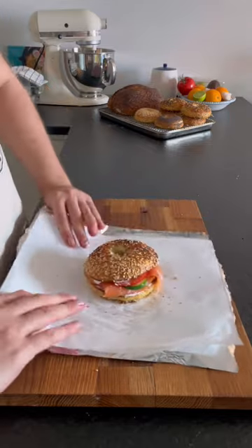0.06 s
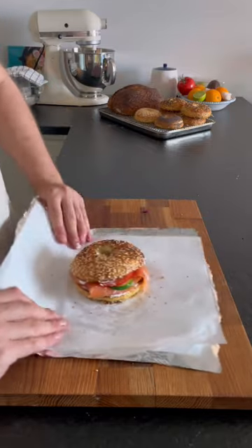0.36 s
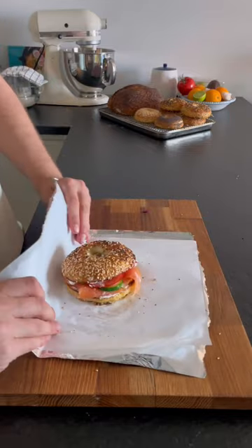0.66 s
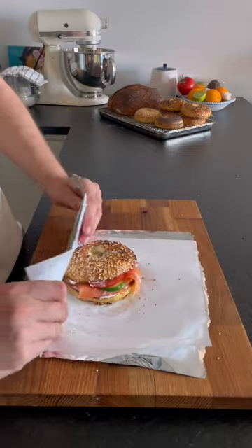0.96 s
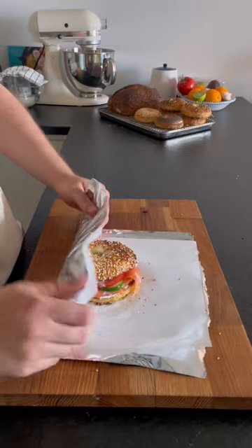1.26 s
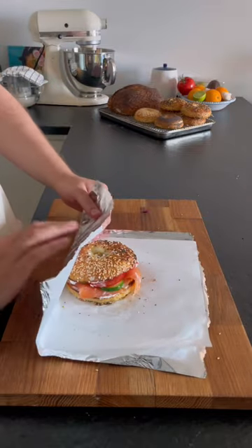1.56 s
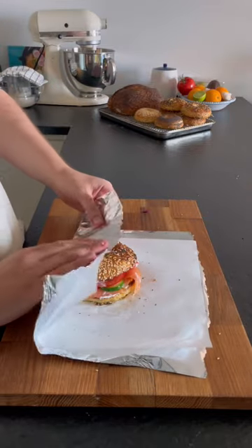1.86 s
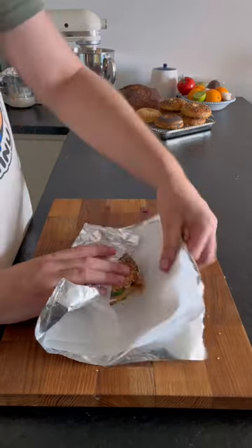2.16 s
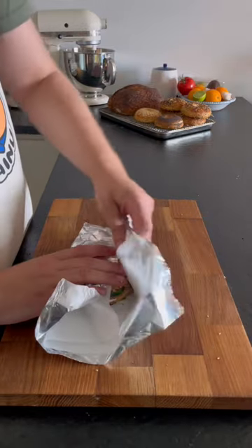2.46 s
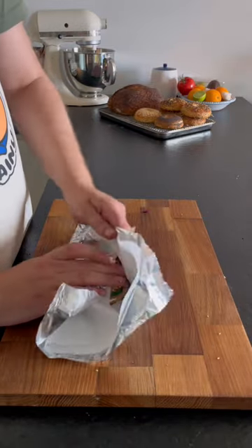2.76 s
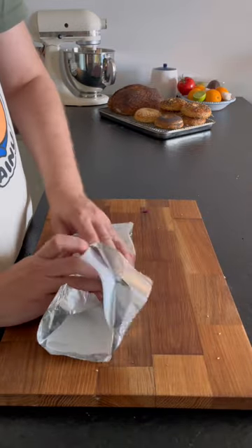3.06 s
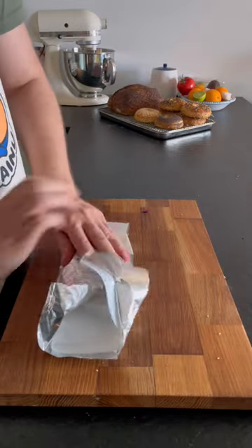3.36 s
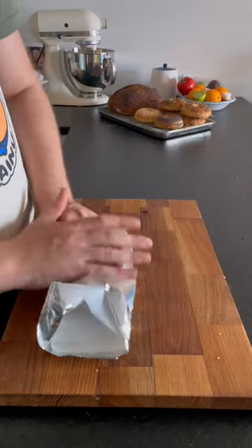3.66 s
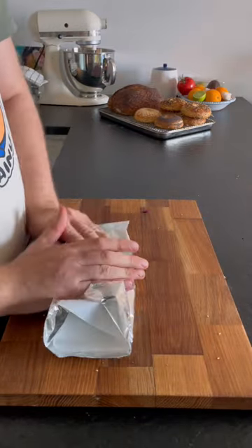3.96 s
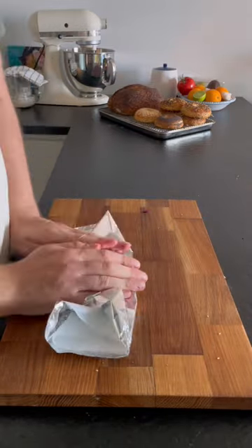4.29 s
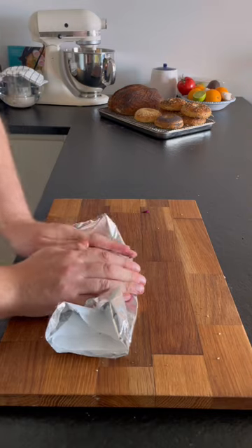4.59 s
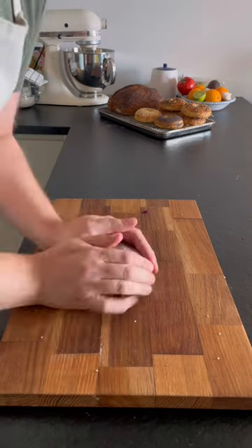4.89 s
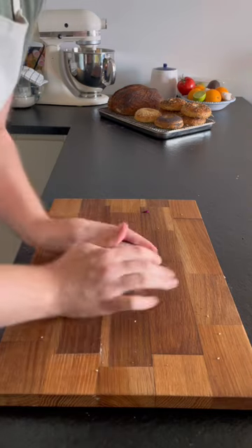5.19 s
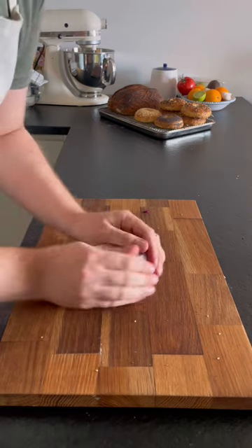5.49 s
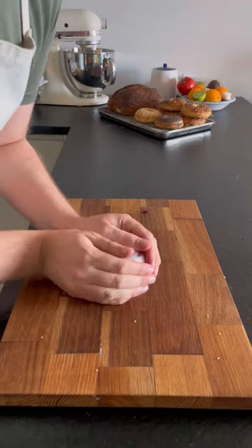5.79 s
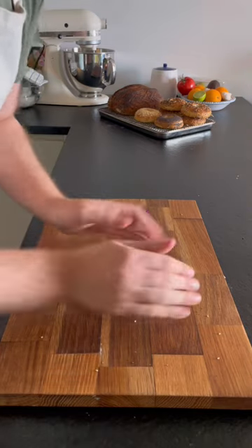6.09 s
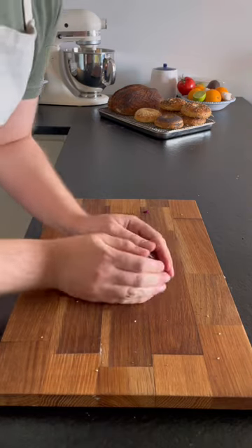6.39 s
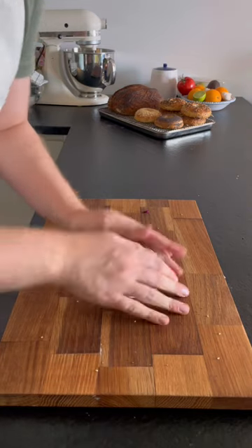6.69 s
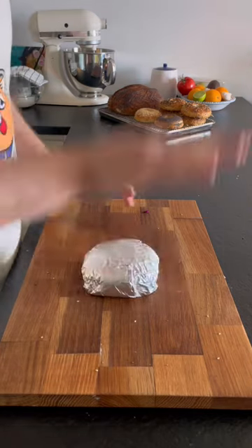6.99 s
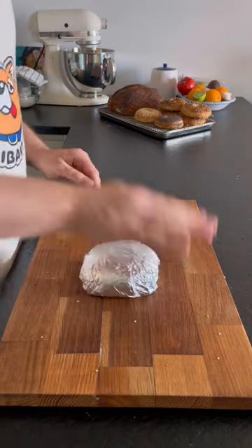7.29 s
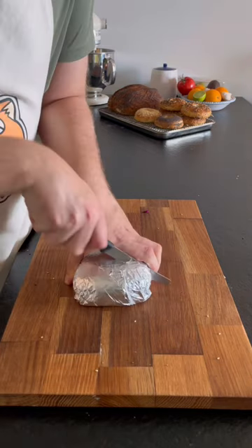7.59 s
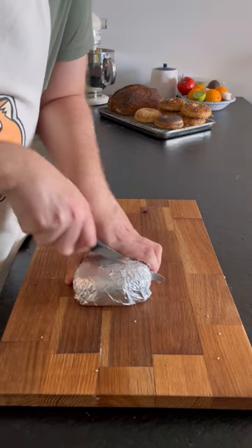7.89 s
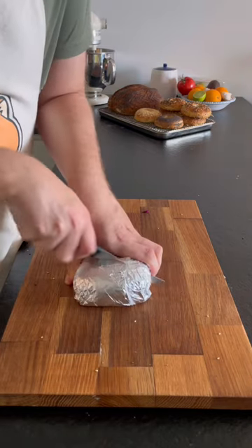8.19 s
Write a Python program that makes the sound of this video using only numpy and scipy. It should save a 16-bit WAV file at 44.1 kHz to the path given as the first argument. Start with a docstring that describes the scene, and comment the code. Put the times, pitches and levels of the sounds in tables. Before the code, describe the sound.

Paper and aluminium foil crinkle as they are wrapped around a bagel, then one firm pat and a knife sawing into the foil.

```python
"""A bagel is wrapped on a wooden board in a kitchen, close to a small two-port microphone.
Parchment slides first; from 1.5 s aluminium foil folds and crumples, its creases buckling and its facets
popping. From 4.9 s palms squeeze and smooth the parcel, and at 7 s one firm pat thumps the board.
From 7.5 s a serrated knife saws into the foil in four strokes. A low room rumble lies under it all."""
import sys
import numpy as np
from scipy import signal
from scipy.fft import rfft, irfft, next_fast_len
from scipy.io import wavfile
from scipy.ndimage import uniform_filter1d

SR = 44100
rng = np.random.default_rng(int(sys.argv[2]) if len(sys.argv) > 2 else 0)


def wav_record(signal):
    """Record a signal, one row per channel, as 16-bit PCM in the file named by sys.argv[1]."""
    frames = np.transpose(np.atleast_2d(signal))
    bounded = np.clip(frames, -1, 1)
    # unit amplitude maps onto the largest positive 16-bit level
    quanta = np.round(bounded * 32767).astype(np.int16)
    wavfile.write(sys.argv[1], SR, quanta)


N = 372644
TIME = np.arange(N) / SR
FFT_SIZE = next_fast_len(N + SR)
BIN_HZ = np.arange(FFT_SIZE // 2 + 1) * SR / FFT_SIZE
CUTOFF_HZ = 16100


# Spectra of the two sheets. Each row: frequency in Hz, relative level in dB.
PAPER_SPECTRUM = [(130, -15), (400, -5), (1300, -10.5), (2600, -13), (4000, -5.5), (6000, -1), (8500, 2),
                  (10800, 4), (13000, -7.5), (16000, -28)]
FOIL_SPECTRUM = [(130, -12.5), (400, -7.5), (1100, -1), (2400, -11), (3700, -1.5), (4900, -6.5),
                 (6200, 2.5), (8200, -1.5), (10000, 0.5), (12000, -1.5), (14000, -28), (16000, -40)]
# Hollowness of lifted or cupped panels. Each row: time in seconds, body re crackle in dB.
HOLLOWNESS = [(0, -21.5), (.45, -12.5), (1.05, -2.5), (1.55, -23), (2.0, -12.5), (2.2, -21.5), (2.7, -10.5),
              (3.45, -12), (4.0, -3.5), (4.6, -5.5), (5.0, -10)]

def wrapping(foil_from_s=1.5, press_from_s=3.44, press_takes_s=0.62):
    """Parchment slides first, then the foil buckles; the bass goes as the air is pressed out."""
    strength, sliding = folding(), TIME < foil_from_s
    pressed = np.clip((TIME - press_from_s) / press_takes_s, 0, 1)
    pocket_db = np.where(sliding, -10.5, 6 * (1 - pressed) - 9 * pressed)
    # foil buckles more often the harder it is worked
    foil_per_s = 3600 * (strength / from_db(-38)) ** .75
    paper_hits = creases(per_s=7000, spread_db=2, clump_db=2.5) * sliding
    paper = sheet(paper_hits, PAPER_SPECTRUM, damping=5.4, travel_s=.0008)
    foil_hits = creases(foil_per_s, spread_db=2.5, clump_db=1.36) * ~sliding
    foil = sheet(foil_hits, FOIL_SPECTRUM, damping=5.4, travel_s=.0006)
    flips = crinkles(per_s=150, level_db=2.5, spread_db=3.5) * from_db(-3 * sliding)
    crackle = from_db(0.1) * rustle(paper + foil, in_time(HOLLOWNESS), pocket_db)
    return strength * (crackle + flips)


# Steady handling of the sheets. Each row: time in seconds, level in dB.
CARRY_LEVELS = [(0, -41.5), (.5, -43), (.95, -54.5), (1.3, -46), (1.44, -55.5), (1.5, -65.5), (1.66, -50),
                (1.9, -45), (2.13, -46.5), (2.25, -37.5), (2.6, -40.5), (2.8, -43.5), (3.1, -40.5),
                (3.33, -47.5), (3.45, -43), (3.56, -53.5), (3.75, -39.5), (4.0, -43), (4.35, -43.5),
                (4.5, -47.5), (4.8, -49), (4.9, -51)]
# Folds pushed in by hand. Each row: start in seconds, length in seconds, level in dB.
HAND_FOLDS = [(.065, 0.017, -34.5), (.18, 0.083, -39), (.36, 0.039, -40), (.692, 0.017, -43),
              (1.05, 0.021, -45), (1.26, 0.018, -43), (1.688, 0.034, -45), (1.785, 0.081, -45),
              (2.0, 0.046, -41), (2.154, 0.043, -33), (2.356, 0.0087, -30), (2.433, 0.018, -34.5),
              (2.513, 0.051, -37), (2.655, 0.08, -39.5), (2.833, 0.041, -37.5), (3.033, 0.12, -41.5),
              (3.17, 0.079, -38.5), (3.358, 0.049, -35.5), (3.645, 0.077, -38), (3.84, 0.14, -46.5),
              (4.106, 0.02, -37), (4.211, 0.024, -36.5), (4.36, 0.083, -41.5), (4.568, 0.075, -44.5),
              (4.752, 0.052, -46)]

def folding():
    """Gain of the crackle: the carried sheets rustle on, and every fold adds a burst."""
    carrying = during(CARRY_LEVELS[0][0], CARRY_LEVELS[-1][0]) * from_db(in_time(CARRY_LEVELS))
    return np.hypot(carrying, gestures(HAND_FOLDS, attack_s=.0046, release_s=.016))


def creases(per_s, spread_db, clump_db):
    """Random tiny bucklings, many small and a few large, that come in clumps."""
    sizes = from_db(spread_db * np.minimum(rng.exponential(1, N), 4.6) + clump_db * drift(130))
    return sizes * (rng.random(N) < per_s / SR)


def sheet(hits, spectrum, damping, travel_s, modes=36, facets=1009, wander_db=3.5, wander_per_s=45):
    """Every hit bends one facet, which rings the broad modes with strengths and delays of its own."""
    at, out = np.flatnonzero(hits), np.zeros(N)
    facet, force = at % facets, hits[at]
    for hz in np.linspace(np.sqrt(140), np.sqrt(CUTOFF_HZ), modes) ** 2:
        r, w = np.exp(-np.pi * damping * np.sqrt(hz) / SR), 2 * np.pi * hz / SR
        # long bending waves cross the sheet more slowly
        lag = (travel_s * SR * (4000 / hz) ** .3 * rng.random(facets)).astype(int)
        strength = from_db(at_hz(spectrum, hz)) * (1 - r) * rng.standard_normal(facets)
        # each mode grows and fades as the sheet bends
        wander = np.interp(at / SR * wander_per_s, np.arange(facets), rng.standard_normal(facets))
        push = np.full(N, 1e-18)
        push[np.minimum(at + lag[facet], N - 1)] = force * strength[facet] * from_db(wander_db * wander)
        out += signal.lfilter([1], [1, -2 * r * np.cos(w), r * r], push)
    return signal.lfilter([1, 0, -1], [1], out)


def rustle(grains, body_db, pocket_db):
    """Small facets give the crisp top, whole panels the hollow body, trapped air the bass."""
    top = evened(band(grains, 2000, "high"), [2500, 8000])
    body = evened(band(grains, 2000, "low"), [500, 2000])
    bass = zero_phase_band(body, 550, "low")
    body = band(body + (from_db(pocket_db) - 1) * bass, 117, "high")
    return top - from_db(body_db) * body


# Large creases. Each row: time in seconds, relative level in dB, body re crack in dB.
CREASE_SNAPS = [(0.5677, -23, -0.5), (1.2378, -27, -3), (1.6054, -28, -1), (1.785, -27.5, 3.5),
                (1.933, -22, -2), (2.3701, -18.5, 1.5), (3.04, -19.5, 2.5), (3.082, -20.5, 2.5),
                (3.3625, -28, 6.5), (3.6624, -17, -8), (3.799, -16.5, 3), (3.901, -24, 6.5),
                (4.215, -27, 0), (4.37, -20.5, -11), (4.9071, -29.5, -8), (5.5075, -27, -19),
                (5.621, -28.5, -21), (6.3268, -38, 0), (6.8666, -37, -21), (7.2075, -33.5, -2)]

def snaps(strays_per_s=15):
    """A large crease flips with a sharp crack and drags neighbours along; lesser ones come by chance."""
    times, level_db, body_db = np.transpose(CREASE_SNAPS)
    strays = from_db(12.5) * folding() * (rng.random(N) < strays_per_s / SR)
    hits = avalanche(clicks(times, level_db) + strays, fade_s=.0042, follow_db=-10)
    cracks = from_db(12.5) * band(sheet(hits, FOIL_SPECTRUM, damping=5.6, travel_s=.0004), 280, "high")
    latest = np.maximum(np.searchsorted(times - .002, TIME) - 1, 0)
    return band(cracks, 2600, "high") - from_db(body_db[latest]) * band(cracks, 2600, "low")


def avalanche(hits, fade_s, follow_db):
    """Each hit sets off a dying run of smaller ones."""
    energy = signal.lfilter([1], [1, -np.exp(-2 / (fade_s * SR))], hits ** 2 + 1e-18)
    followers = (rng.random(N) < .1) * (energy > 1e-8)
    return hits + from_db(follow_db) * np.sqrt(energy) * followers


# Taut facets flipping over. Each row: time in seconds, level in dB, pitch in Hz.
FACET_POPS = [(.523, -25.5, 3450), (.705, -25, 1170), (1.237, -26, 1260), (1.326, -32, 1320),
              (1.728, -24, 5900), (1.756, -28, 3200), (2.002, -37, 4130), (2.365, -21, 3770),
              (2.4525, -19, 6600), (2.7025, -23, 2550), (3.38, -30, 624), (3.639, -27, 3700),
              (4.0197, -26, 1440), (4.068, -19, 3520), (4.112, -27, 810), (4.225, -33, 950),
              (4.403, -25.5, 660), (4.59, -29.5, 1050), (4.62, -23, 1580), (4.706, -29.5, 3150),
              (5.43, -39, 1280), (5.528, -31, 2950), (5.681, -29, 3860), (6.181, -29, 6340),
              (6.504, -34, 1880), (8.337, -27.5, 695)]

def pops(rows):
    """Facets flip with a pitched tick; small ones ring higher and die sooner."""
    out, t = np.zeros(N + SR), TIME[:SR // 50]
    for start_s, level_db, hz in rows:
        at, t60_s = round(start_s * SR), .0093 * (1000 / hz) ** .23
        out[at:at + len(t)] += from_db(level_db - 60 * t / t60_s) * np.sin(2 * np.pi * hz * t)
    return band(out[:N], 420, "high")


# Facet pitch ranges, all equally likely. Each entry: range edge in Hz.
CRINKLE_EDGES_HZ = [1080, 2900, 4220, 5660, 6800, 8500]

def crinkles(per_s, level_db, spread_db, count=2000):
    """Facets flip by chance: separate little ticks at ever-changing pitches."""
    wait, size, pitch = rng.random((count, 3)).T
    times = np.cumsum(-np.log(1 - wait)) / per_s
    levels_db = level_db + spread_db * np.minimum(-np.log(1 - size), 2)
    hz = np.interp(pitch, np.linspace(0, 1, len(CRINKLE_EDGES_HZ)), CRINKLE_EDGES_HZ)
    return pops(np.transpose([times, levels_db, hz])[times < TIME[-1]])


# Palm strokes. Each row: start, rise, length and fade in seconds, level in dB, body re crackle in dB.
PALM_RUBS = [(5.062, 0.165, 0.16, 0.033, -39, -14.5), (5.785, 0.081, 0.19, 0.051, -43, -10.5)]
# Squeezes. Each row: start and length in seconds, level in dB, body re crackle in dB.
HAND_SQUEEZES = [(4.886, 0.088, -49.5, -24), (4.998, 0.16, -55.5, -23), (5.389, 0.15, -50, -20),
                 (5.517, 0.044, -45.5, -23), (5.602, 0.086, -51, -24), (5.731, 0.16, -57.5, -17),
                 (6.15, 0.035, -46.5, -5.5), (6.213, 0.31, -55, -12.5), (6.627, 0.083, -58, -6.5)]
# Foil under the palms. Each row: frequency in Hz, relative level in dB.
PALM_SPECTRUM = [(130, -9), (700, -3.5), (1450, 4), (2500, -2.5), (3700, 6), (4900, -4.5), (5700, 4),
                 (8200, 0.5), (10200, 5.5), (13000, -11.5), (16000, -58)]

def smoothing(rub_pocket_db=-4, squeeze_pocket_db=8):
    """Skin brushes over the wrinkles in even grains; squeezes between the strokes tick."""
    rubs = [gestures([(start, length, level_db)], rise, fade)
            for start, rise, length, fade, level_db, _ in PALM_RUBS]
    squeezes = [gestures([row[:3]], attack_s=.0062, release_s=.024) for row in HAND_SQUEEZES]
    strength = np.linalg.norm(rubs + squeezes, axis=0)
    shares = (np.array(rubs + squeezes) / strength) ** 2
    rubbing = shares[:len(rubs)].sum(axis=0)
    body_db = np.array([row[-1] for row in PALM_RUBS + HAND_SQUEEZES]) @ shares
    pocket_db = rub_pocket_db * rubbing + squeeze_pocket_db * (1 - rubbing)
    rub_hits = creases(per_s=6000, spread_db=1, clump_db=0)
    squeeze_hits = creases(per_s=2400, spread_db=3, clump_db=2.8)
    hits = np.where(rubbing > .5, rub_hits, squeeze_hits)
    grains = sheet(hits, PALM_SPECTRUM, damping=9.2, travel_s=.0007)
    crackle = from_db(-0.5) * rustle(grains, body_db, pocket_db)
    return strength * (crackle + (1 - rubbing) * crinkles(per_s=80, level_db=0, spread_db=5))


# Foil crushed flat. Each row: frequency in Hz, relative level in dB.
CRUSH_SPECTRUM = [(130, -7), (1100, -5.5), (6500, -3.5), (12000, -6.5), (16000, -46)]
# Board and worktop modes. Each row: frequency in Hz, relative level in dB, t60 in seconds.
BOARD_MODES = [(56.8, -14.5, 0.87), (97, -37, 0.33), (147, -17, 0.57), (198, -17, 0.29), (240, 1.5, 0.034),
               (327, -17, 0.081), (495, -11.5, 0.059), (720, -6, 0.014)]

def pat(crush_s=7.040, land_s=7.0445):
    """The palm grazes and crushes the foil, then loads the board; foil settles and the cabinet booms."""
    approach = gestures([(crush_s - .009, .008, -33)], attack_s=.0054, release_s=.0037)
    graze = approach * creases(per_s=17000, spread_db=5, clump_db=-10)
    crush = avalanche(clicks([crush_s], [-11.5]), fade_s=.0091, follow_db=7.5)
    since_s = np.maximum(TIME - crush_s, 0)
    settling = from_db(-29) * np.exp(-since_s / .069) * (since_s > 0)
    settle = settling * creases(per_s=5100, spread_db=2.5, clump_db=2.5)
    foil = sheet(graze + crush + settle, CRUSH_SPECTRUM, damping=6.4, travel_s=.00048)
    push = band(clicks([land_s], [-17]) + 1e-18, 1200, "low")
    thump = sum(from_db(level_db) * ring(push, hz, t60_s) for hz, level_db, t60_s in BOARD_MODES)
    burst = rng.standard_normal(N) * np.exp(-since_s / .082) * (TIME > land_s)
    boom = from_db(-16.5) * band(burst, [58, 210], "band")
    return foil - band(thump, 88, "high") + band(boom, 54, "high")


# Forward strokes. Each row: start, length and release in seconds, relative level in dB,
# initial rate in teeth/s, speed-up in teeth/s^2.
KNIFE_PUSHES = [(7.467, 0.065, 0.016, -19, 197, 1330), (7.721, 0.061, 0.041, -24.5, 120, 300),
                (8.001, 0.05, 0.036, -22, 100, 1700), (8.3, 0.044, 0.0068, -30, 142, 630)]
# Back strokes. Each row: middle and half length in seconds, scrape level in dB.
KNIFE_PULLS = [(7.648, 0.047, -39), (7.923, 0.045, -41.5), (8.22, 0.041, -40), (8.44, 0.026, -46)]
# Foil under the blade. Each row: frequency in Hz, relative level in dB.
CUT_SPECTRUM = [(130, -23), (330, -3.5), (500, -4), (850, 1.5), (1900, -8), (2800, -4.5), (3600, -3),
                (4500, -4), (5500, -33), (6800, -0.5), (8300, -25), (9800, -0.5), (11500, -28),
                (16000, -48)]
# Blade modes. Each row: frequency in Hz, relative level in dB, t60 in seconds.
KNIFE_MODES = [(3630, -3, 0.0052), (4330, -0.5, 0.0043), (6700, -10.5, 0.0041)]
# Teeth snagging on thick wrinkles. Each row: time in seconds, relative level in dB.
WRINKLE_RIPS = [(7.4873, -25), (7.5024, -12), (7.5137, -18), (7.517, -12.5), (7.5258, -14), (7.531, -18),
                (7.5496, -21), (7.740, -20), (7.7561, -17), (7.7747, -15.5), (7.7824, -19.5), (7.8053, -25),
                (8.01, -25), (8.0192, -20), (8.0282, -18.5), (8.0332, -23), (8.043, -27), (8.0854, -22),
                (8.2145, -31), (8.3291, -29)]

def knife(push_scrape_db=-14, turn_scrape_db=-60):
    """Teeth rip the foil and pluck the blade on each push; between pushes it scrapes along the cut."""
    cutting = TIME > KNIFE_PUSHES[0][0]
    push = sum(gestures([(start, length, level_db)], attack_s=.017, release_s=release)
               for start, length, release, level_db, *_ in KNIFE_PUSHES)
    pull = sum(from_db(level_db) * np.exp(-((TIME - middle) / half) ** 2)
               for middle, half, level_db in KNIFE_PULLS)
    plucks = push * serrations(KNIFE_PUSHES) + clicks(*np.transpose(WRINKLE_RIPS))
    tears = avalanche(plucks, fade_s=.0024, follow_db=-16)
    teeth = from_db(14) * sheet(tears, CUT_SPECTRUM, damping=5, travel_s=.0007)
    scrape_hits = creases(per_s=3700, spread_db=3, clump_db=1)
    grains = sheet(scrape_hits, CUT_SPECTRUM, damping=5.7, travel_s=.00095)
    grains += from_db(12) * zero_phase_band(grains, 5500, "high")
    scrape_gains = [from_db(push_scrape_db) * push, pull, from_db(turn_scrape_db) * cutting]
    scrape = np.linalg.norm(scrape_gains, axis=0) * evened(grains, [2500, 8000])
    rasp = sum((-1) ** k * ring(plucks * from_db(level_db + 2.1 * drift(300)), hz, t60_s)
               for k, (hz, level_db, t60_s) in enumerate(KNIFE_MODES))
    return teeth + scrape + rasp + twangs(plucks) + board_under_knife(plucks, cutting)


def serrations(pushes, count=26, jitter_teeth=.15, spread_db=1):
    """Teeth catch one after another, a little unevenly, and faster as the blade gathers speed."""
    out = np.zeros(N)
    for start, *_, per_s, speedup in pushes:
        teeth = np.maximum(np.arange(count) + 1 + jitter_teeth * rng.standard_normal(count), 0)
        times = start + 2 * teeth / (per_s + np.sqrt(per_s ** 2 + 2 * abs(speedup) * teeth))
        out += clicks(np.minimum(times, TIME[-1]), spread_db * rng.standard_normal(count))
    return out


def twangs(plucks, from_hz=3015, fall_s=.00216, fade_s=.0027):
    """Each pluck runs along the blade as a bending wave, highs first, so its pitch falls."""
    t = TIME[:SR // 80]
    turns = from_hz * t / (1 + t / fall_s)
    chirp = from_db(-12.5) * np.sin(2 * np.pi * turns) * np.exp(-t / fade_s)
    return signal.oaconvolve(plucks, chirp)[:N]


def board_under_knife(plucks, cutting):
    """Each tooth knocks the parcel on the board; the weight on the blade makes the worktop rumble."""
    knock = ring(plucks, hz=336, t60_s=.085) + ring(plucks, hz=224, t60_s=.016)
    rumble = evened(band(rng.standard_normal(N), [65, 105], "band"), [50, 130])
    return from_db(-26.5) * band(knock, 54, "high") + from_db(-60) * rumble * cutting


# Background rumble. Each row: time in seconds, relative level in dB.
ROOM_LEVELS = [(0, -53.5), (1.9, -59), (2.6, -64.5), (3.2, -56), (4.1, -65.5), (6.0, -64.5), (6.35, -55.5),
               (7.0, -62.5), (7.45, -60), (7.67, -54.5), (8.45, -57.5)]
# Its spectrum. Each row: frequency in Hz, relative level in dB.
ROOM_SPECTRUM = [(25, -19), (42, -8), (58, -2), (130, 2), (175, -5.5), (480, -9.5), (1000, -19),
                 (5000, -21), (16000, -32)]

def room_tone():
    """Soft, dark noise of the kitchen and of arms leaning on the board."""
    spectrum = rfft(rng.standard_normal(FFT_SIZE)) * from_db(at_hz(ROOM_SPECTRUM, BIN_HZ))
    noise = irfft(spectrum, FFT_SIZE)[:N]
    return from_db(in_time(ROOM_LEVELS) - 2) * noise / np.std(noise)


def kitchen_reverb(t60_s, tail_db, wall_hz):
    """Frequency response of the diffuse, slightly dull tail from the walls."""
    t = TIME[:SR]
    tail = rng.standard_normal(SR) * from_db(-60 * t / t60_s) * (t > .003)
    return rfft(band(from_db(tail_db) * tail / np.linalg.norm(tail), wall_hz, "low"), FFT_SIZE)


def gestures(rows, attack_s, release_s):
    """Gain of a run of movements: each builds up, holds and dies away; their powers add."""
    power = np.full(N, 1e-14)
    for start, length, level_db in rows:
        near = (TIME > start) & (TIME < start + 1)
        t = TIME[near] - start
        envelope = np.minimum(t / attack_s, 1) * np.exp(-np.maximum(t - length, 0) / release_s)
        power[near] += (from_db(level_db) * envelope) ** 2
    return np.sqrt(power)


def ring(push, hz, t60_s):
    """One mode: a unit click starts a decaying sine of height one."""
    r, w = np.exp(-np.log(1000) / (t60_s * SR)), 2 * np.pi * hz / SR
    return signal.lfilter([0, np.sin(w)], [1, -2 * r * np.cos(w), r * r], push + 1e-18)


def clicks(times, levels_db):
    """One impulse per event."""
    out = np.zeros(N)
    out[np.round(np.asarray(times) * SR).astype(int)] = from_db(levels_db)
    return out


def drift(per_s):
    """Random curve with a spread near one."""
    return np.interp(TIME * per_s, np.arange(N), rng.standard_normal(N))


def evened(x, edges_hz):
    """Holds the rms within a band at one, over about 50 ms."""
    power = uniform_filter1d(band(x, edges_hz, "band") ** 2, size=2400)
    return x / np.sqrt(np.abs(power) + 1e-14)


def band(x, hz, kind):
    """Second-order Butterworth filter."""
    return signal.sosfilt(signal.butter(2, hz, kind, fs=SR, output="sos"), x)


def zero_phase_band(x, hz, kind):
    """The same filter run forwards and backwards."""
    return signal.sosfiltfilt(signal.butter(2, hz, kind, fs=SR, output="sos"), x)


def during(start_s, end_s):
    """Gate with short fades."""
    return uniform_filter1d(1. * ((TIME >= start_s) & (TIME <= end_s)), size=100)


def in_time(points):
    """A curve read at every sample."""
    return np.interp(TIME, *np.transpose(points))


def at_hz(points, hz):
    """A curve read on a log-frequency axis."""
    knots_hz, values = np.transpose(points)
    return np.interp(np.log(hz + 1e-9), np.log(knots_hz), values)


def from_db(db):
    """Decibels to gain."""
    return 10 ** (np.asarray(db) / 20)


# Phase between the ports. Each row: frequency in Hz, lead of the left port in radians.
PORT_PHASE = [(20, .05), (200, .2), (600, .45), (1600, .08), (2300, .15), (3200, .6), (4200, .8),
              (4850, 1.5), (5100, .3), (5700, .2), (6500, 1.1), (8400, 2.1), (9000, 2.5), (9600, 3.05),
              (10700, 3.2), (11400, 3.55), (12800, 4.6), (14000, 6.2)]

def scene():
    """The ports hear one direct sound with a phase between them; the side holds more of the room."""
    sources = wrapping() + smoothing() + snaps() + pops(FACET_POPS) + pat() + knife() + room_tone()
    direct = rfft(sources, FFT_SIZE)
    half_phase = at_hz(PORT_PHASE, BIN_HZ) / 2
    mid = direct * (1 + kitchen_reverb(t60_s=.44, tail_db=-11.5, wall_hz=12800))
    side = direct * (1 + kitchen_reverb(t60_s=.42, tail_db=-2, wall_hz=7600))
    mid, side = mid * np.cos(half_phase), 1j * side * np.sin(half_phase)
    return irfft(np.array([mid + side, mid - side]), FFT_SIZE)[:, :N]


# Brief silences. Each row: start and end in seconds.
GAPS = [(4.883, 4.895), (7.456, 7.4695)]

def record(dry):
    """The sound drops out twice for an instant; the top is cut steeply."""
    live = 1 - sum(during(start_s, end_s) for start_s, end_s in GAPS)
    return signal.sosfilt(signal.ellip(10, .2, 80, CUTOFF_HZ, fs=SR, output="sos"), dry * live)


dry = scene()
out = record(dry)
wav_record(out)
```